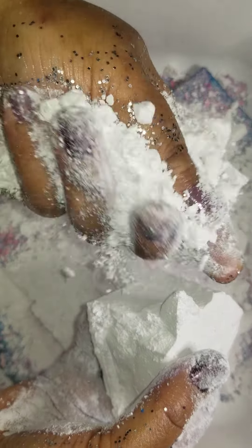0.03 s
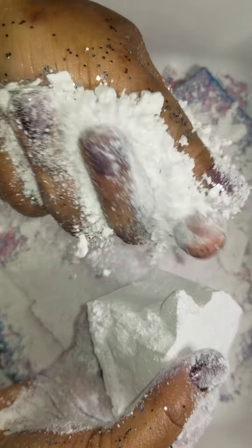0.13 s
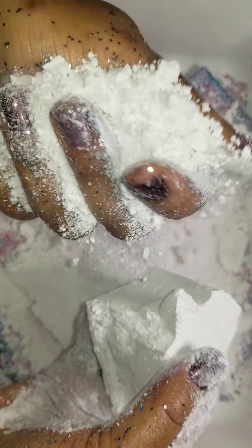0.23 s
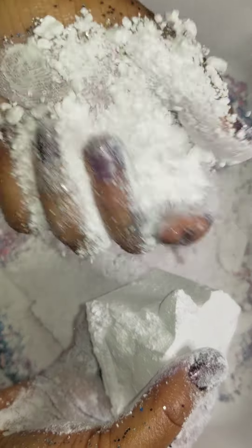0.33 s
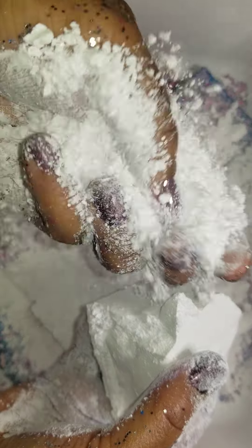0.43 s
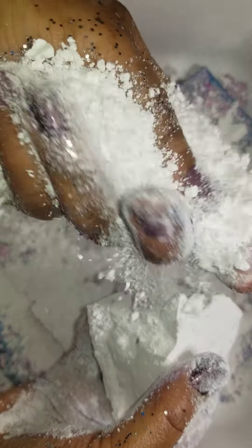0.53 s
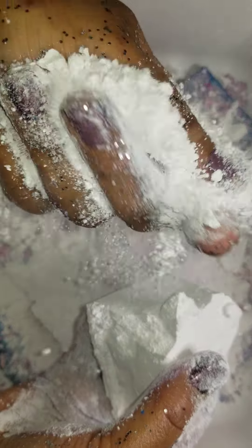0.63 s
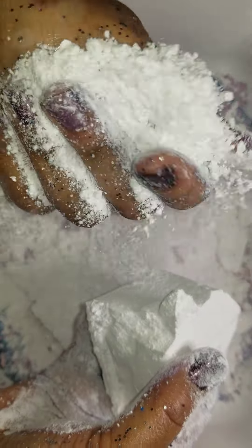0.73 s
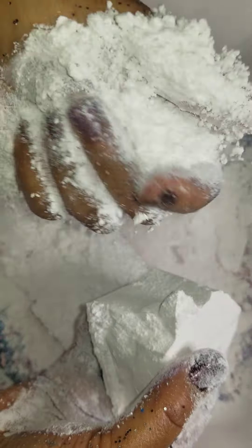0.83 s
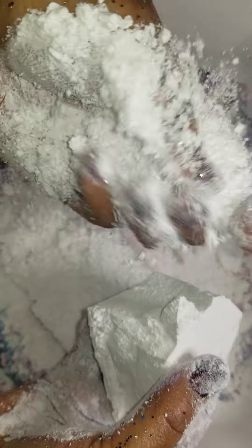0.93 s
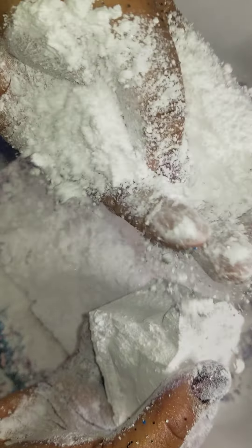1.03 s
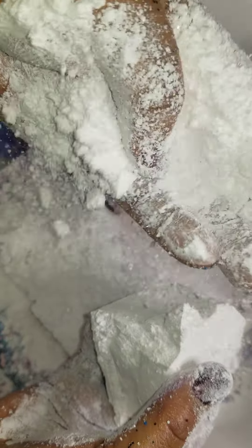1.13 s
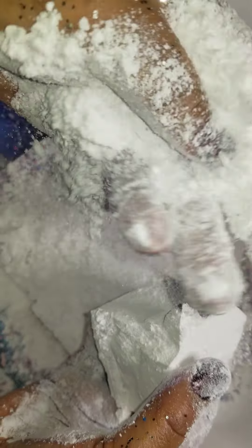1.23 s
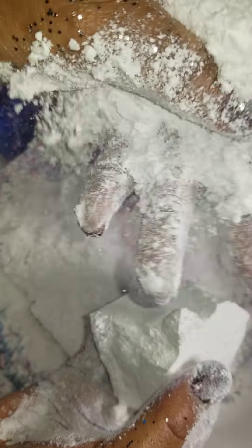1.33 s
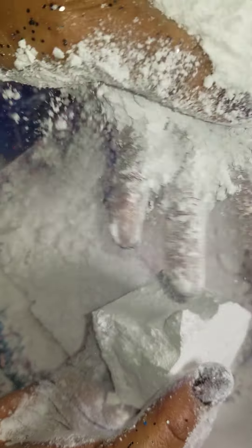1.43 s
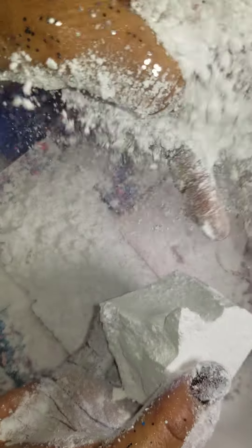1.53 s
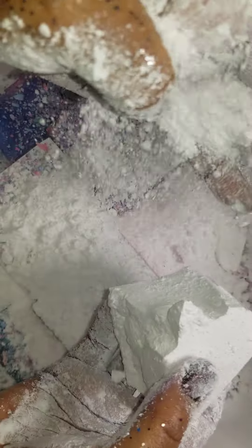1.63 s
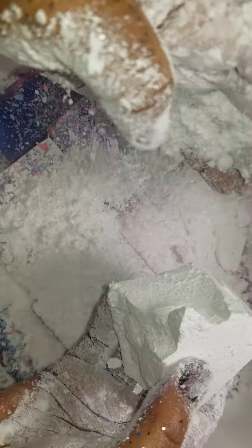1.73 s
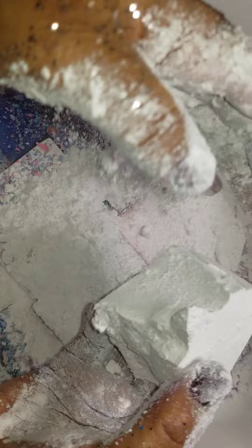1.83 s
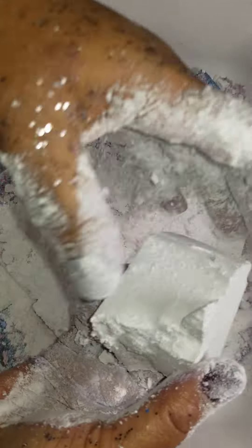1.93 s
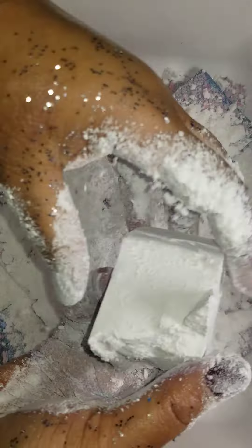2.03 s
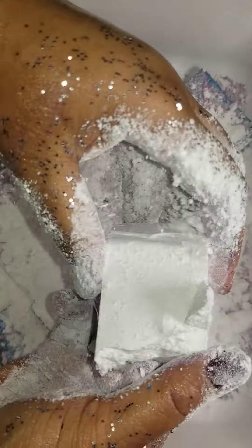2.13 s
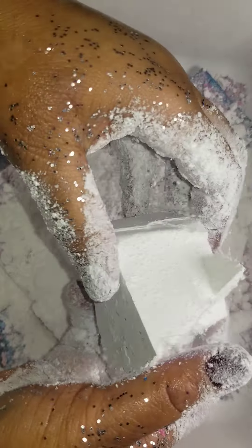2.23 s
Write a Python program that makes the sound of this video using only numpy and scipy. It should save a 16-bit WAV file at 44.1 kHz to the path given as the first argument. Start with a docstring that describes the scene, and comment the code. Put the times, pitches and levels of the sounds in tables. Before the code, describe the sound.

Hands crush soft dry chalk over a tray; sharp cracks and dull knocks come thick at first, thin out to quiet crumbs, then small snaps return and skin hisses over powder. Close, dry, faint low hum.

```python
"""A faint knock and patter on a tray come first; within a fraction of a second sharp snaps and harder knocks crowd in.
Hands crumble soft chalk close to a small microphone: each snap is a dying noise burst rung through fragment and block,
each knock a soft push on the modes of the tray. Crumbs crackle in the fist as clumped, pitched rasps, and powdery
skin slides over the block as flickering bands of noise. A wavering sine hums above a low rumble of noise."""
import sys
import numpy as np
from scipy import signal
from scipy.io import wavfile

SR = 44100
rng = np.random.default_rng(int(sys.argv[2]) if len(sys.argv) > 2 else 0)


def gain_from_decibels(decibels):
    """Convert decibel values to linear amplitude factors."""
    exponent = np.asarray(decibels, float) / 20
    return 10 ** exponent


def materialize(psi):
    """Save the field psi as 16-bit PCM at rate SR to the path in sys.argv[1].

    A 1-D psi becomes a single channel; in a 2-D psi each row is a channel.
    """
    bounded = np.clip(np.atleast_2d(psi).T, -1, 1)
    quanta = np.round(bounded * 32767).astype(np.int16)
    wavfile.write(sys.argv[1], SR, quanta)


N = 101430

# Snaps of the pieces: (time [s], peak level [dB], ring [Hz], tearing time constant [ms], broad crack share [0-1])
SNAP_EVENTS = [(0.055, -39, 4200, 3.6, 0.35), (0.0641, -39, 4280, 1.6, 0.65), (0.0908, -36.5, 6220, 1.6, 0),
               (.1366, -24, 7100, 1.8, 0.33), (0.1373, -20.5, 12200, 2.6, 0),
               (0.1719, -35.5, 1970, 4.4, 0.6), (.175, -28.5, 14300, 2, 0.1), (.197, -31, 4770, 1.6, 0.25),
               (.2162, -22, 3180, 2.5, 0.17), (0.2184, -24, 11900, 1.4, 1), (0.239, -29, 2880, 3.1, 0.38),
               (.2576, -29.5, 2200, 2.6, 0), (0.2927, -28.5, 1680, 3.4, 0.45),
               (0.3046, -41.5, 3876, 1.7, 0.4), (0.3891, -34, 7200, 1.2, 0.03), (.419, -41.5, 3900, 1.1, 1),
               (0.4541, -22, 6600, 1.9, 0), (.476, -37.5, 3150, 2.6, 0.9), (0.506, -36, 3080, 6.1, 0),
               (0.5107, -24, 3400, 3.9, 0.98), (0.51, -29.5, 8000, 1.9, 0.22), (.518, -43, 3000, 1.3, 0.3),
               (.552, -31.5, 3680, 3.4, 0.42), (0.5743, -32, 2600, 0.75, 0), (0.583, -44, 3450, 2.8, .5),
               (.5865, -48, 6960, 0.8, 0), (0.609, -19, 3700, 0.99, 0.04), (0.641, -42, 2100, 3.1, 0.57),
               (.713, -41.5, 2120, 1.7, 0.5), (0.72, -39, 4100, 2.2, 0.23), (0.754, -38.5, 6470, 0.78, 0.7),
               (0.8132, -22, 2480, 0.34, 0.36), (0.842, -39.5, 3640, 2.7, 0.33), (0.885, -38, 3540, 2.2, 0),
               (.9028, -41.5, 6300, 1.1, 0.1), (1.0163, -39.5, 4380, 1, 0.31),
               (1.04, -42, 4310, 1.93, 0.62), (1.214, -46, 5500, 1.8, 0.1),
               (1.2863, -38.5, 7000, 0.26, 0.45), (1.3037, -43, 5060, 1.37, 0),
               (1.346, -42.5, 3780, 1.8, 0.1), (1.387, -46.5, 5320, 0.88, 0), (1.554, -38.5, 2880, 2.1, 0),
               (1.583, -37.5, 3900, 0.5, 0.04), (1.598, -39, 3900, 1.6, 0.04), (1.625, -43, 3600, .8, 0.1),
               (1.638, -40, 3000, 1.6, 0.4), (1.653, -32.5, 3220, 0.84, 0.3), (1.658, -41, 3100, 1.4, 0),
               (1.681, -37.5, 3180, 1.2, 0), (1.7114, -26.5, 4000, 0.7, 0), (1.7242, -28.5, 3090, 1.4, 0.4),
               (1.7362, -42, 4400, .8, 0.1), (1.751, -45, 4020, 0.71, 0), (1.869, -42.5, 3042, 1.4, 0.5),
               (1.924, -37.5, 5010, 4, 0.95), (1.977, -44.5, 5050, 0.75, 0.37)]
FIRST_BREAK = 9  # opening impulse, in units of the tearing noise's initial rms
SNAP_CYCLES = 4.7  # ring of the fragment to -60 dB
BARE_SPAN, TOP_SPAN = 2.18, 3.0  # bare crack's band and top roll-off, as factors of the ring frequency
# Modes of the chalk block: (frequency [Hz], relative level [dB], decay to -60 dB [s])
BLOCK_MODES = [(970, -11.5, .012), (1706, -7, 0.014), (2182, 0.5, 0.0035), (3100, -1.5, 0.0074),
               (3800, -2, 0.0032), (4400, -2, 0.0068), (5500, -6, .006), (6500, -2.5, .006),
               (7870, -8, .005)]
BLOCK_DB, BLOCK_REACH_OCT, BLOCK_SCATTER_DB = 0, .8, 2

# Lumps knocking on the tray: (time [s], peak level [dB], contact cut-off [Hz])
KNOCK_EVENTS = [(.003, -40, 300), (0.052, -34.5, 428), (0.09, -39, 970), (0.1347, -27, 453),
                (.154, -50, 1487), (0.1715, -29.5, 1610), (0.174, -30, 263), (0.183, -24.5, 220),
                (0.2, -24.5, 297), (0.2163, -3.5, 3600), (0.238, -24, 580), (0.247, -41, 299.7),
                (0.261, -33, 299), (0.276, -35, 99), (0.292, -32.5, 2000), (0.297, -38.5, 520),
                (0.387, -45.5, 264), (.450, -47, 756), (0.507, -41.5, 800), (.575, -45.5, 660),
                (0.609, -46.5, 200), (.643, -48, 640), (0.767, -38, 890), (0.811, -41.5, 800),
                (1.018, -55, 304.3), (1.216, -48, 439.3), (1.305, -44, 255), (1.551, -52.5, 360),
                (1.641, -47.5, 900), (1.768, -53, 620), (1.926, -52, 417)]
# Modes of the tray: (frequency [Hz], relative level [dB], decay to -60 dB [s])
TRAY_MODES = [(91.7, -23, 0.078), (199.6, -14, 0.033), (302.4, -13, 0.028), (371.2, -13.5, .06),
              (468, -10, 0.039), (490, -12.5, 0.064), (690, -13, 0.062), (761, -10, 0.055), (937, 2, 0.02),
              (1200, -7, 0.017), (1387, -8.5, .022), (1750, -11, 0.012)]
MODE_SCATTER_DB = 2
PATTER_PER_S, PATTER_CUT_HZ, PATTER_DRIVE_DB = 140, 700, -39

# The fist working the crumbs: (time [s], crackle level [dB], patter level before its drive [dB])
FIST_WORK = [(0, -53.5, -37), (.05, -62, -45.5), (.15, -51, -43), (.25, -52, -38), (.33, -53, -51),
             (.37, -59.5, -52), (.42, -59.5, -49), (.5, -62.5, -79), (.55, -49, -51), (.67, -60.5, -66.5),
             (.77, -48.5, -46.5), (.86, -56, -57), (.97, -65.5, -55.5), (1.08, -68.5, -63),
             (1.18, -73, -64), (1.23, -61, -62), (1.38, -62.5, -66), (1.43, -85, -67), (1.49, -58, -71),
             (1.6, -58.5, -66), (1.7, -56, -66), (1.81, -60.5, -73), (1.86, -70.5, -73),
             (1.92, -64.5, -53.5), (2.02, -70.5, -66.5), (2.3, -70, -66.5)]
# Weight of the crumb pitches: (frequency [Hz], relative level [dB])
CRUMB_SPECTRUM = [(950, -4.5), (1800, -5.5), (3100, -4.5), (4400, -10.5), (6500, -8.5), (8000, -9.5)]
# Pitches of crumbs around each block mode: (frequency ratio [1])
CRUMB_RATIOS = [.97, 1, 1.04]
CRUMBS_PER_S, CRUMB_SIZE_DB, CRUMB_CLUMP_DB = 1800, 3.5, 5.5  # median rate, size spread, rate spread
CRUMB_MS, CRUMB_CYCLES = .7, 17  # time constant of the rasp; ring to -60 dB

# Skin sliding on powder: (time [s], hiss level [dB], brightness [dB per octave])
SKIN_SLIDE = [(0, -59, -10.5), (.1, -68, 0), (.2, -57, 0.5), (.33, -66, 1), (.45, -68.5, -1), (.55, -68, 6),
              (.67, -66.5, -4), (.78, -58.5, 0), (.88, -70.5, -5), (.95, -57, -2.5), (1.0, -67.5, -4),
              (1.15, -79.5, 0.5), (1.25, -68.5, -1.5), (1.38, -64.5, -5), (1.44, -79, -5.5),
              (1.49, -52.5, -0.5), (1.54, -57.5, -2.5), (1.8, -54.5, -3.5), (1.86, -71.5, 1),
              (1.92, -56.5, -3.5), (2.02, -72.5, 0), (2.06, -59.5, 2.5), (2.16, -53, -1.5), (2.2, -50, 2.5),
              (2.218, -43, 3), (2.23, -49, 1.5), (2.275, -51, -2), (2.287, -68.5, 9), (2.3, -67, 1)]
# Spectrum of the hiss: (frequency [Hz], relative density [dB per Hz])
HISS_SPECTRUM = [(1300, -21), (2500, -17), (3000, -7), (4000, -1), (5200, 0), (6800, -5), (9000, -6),
                 (12000, -8.5), (16000, -10.5)]
HISS_PATCHY_DB, TILT_PIVOT_HZ = 2.5, 7000

# Course of the hum: (time [s], frequency [Hz], level [dB]), before the waver
HUM_COURSE = [(0, 60.4, -57.5), (.3, 60.4, -49.5), (.45, 61.6, -72), (.58, 59.7, -53), (.8, 59.1, -50),
              (1.0, 61.4, -42.5), (1.2, 59, -46.5), (1.27, 60.3, -53.5), (1.35, 57.2, -58),
              (1.43, 57.57, -60.5), (1.56, 58.27, -49.5), (1.9, 58.7, -45.5), (2.23, 56.3, -44),
              (2.3, 55.8, -44.5)]
HUM_WAVER_DB, HUM_WAVER_HZ = .8, .5
# Spectrum of the rumble: (frequency [Hz], relative density [dB per Hz])
RUMBLE_SPECTRUM = [(25, -8.5), (50, 7), (85, 5), (112, -9), (145, -1.5), (200, -17.5), (400, -22),
                   (900, -38.5)]
RUMBLE_DB = -55.5

BASS_CUT_HZ, TOP_CUT_HZ = 30, 16900


def rms_one(x):
    """Normalization: scale a signal to rms 1."""
    return x / np.sqrt(np.mean(x ** 2) + 1e-20)


def in_time(rows):
    """Linear interpolation: the columns of a table become curves in time."""
    s, *columns = np.transpose(rows)
    return [np.interp(np.arange(N) / SR, s, c) for c in columns]


def at_hz(points, hz):
    """Spectral interpolation in dB along a logarithmic frequency axis."""
    table_hz, table_db = np.transpose(points)
    return np.interp(np.log(hz), np.log(table_hz), table_db)


def drift(rate):
    """Slow random fluctuation: noise through two poles at rate [Hz], with rms 1."""
    step = 40  # samples between drawn values
    r = np.exp(-2 * np.pi * rate * step / SR)
    noise = rng.standard_normal(N // step + 2002)
    slow = signal.lfilter([1], [1, -2 * r, r * r], noise)[2000:]  # the filter has settled
    return np.interp(np.arange(N) / step, np.arange(len(slow)), rms_one(slow - slow.mean()))


def ring(push, hz, t60):
    """Damped resonance: a unit impulse starts a decaying sine of nominal height 1."""
    r = gain_from_decibels(-60 / (t60 * SR))
    w = 2 * np.pi * min(hz, .45 * SR) / SR
    return signal.lfilter([0, np.sin(w)], [1, -2 * r * np.cos(w), r * r], push + 1e-18)


def soften(x, hz):
    """Contact compliance: two one-pole low-passes spread a blow in time."""
    r = np.exp(-2 * np.pi * hz / SR)
    return signal.lfilter([(1 - r) ** 2], [1, -2 * r, r * r], x)


def clicks(per_s, size_db):
    """Random impulse process: independent clicks of either sign, with exponentially spread dB sizes."""
    size = gain_from_decibels(size_db * np.minimum(rng.exponential(1, N), 4))
    sign = rng.choice([-1, 1], N)
    return size * sign * (rng.random(N) < per_s / SR)


def banded_noise(spectrum, low_hz, patchy_db, tilt_db, count):
    """Filter-bank synthesis: third-octave noise bands flicker partly together, with a tilt about the pivot."""
    edges = low_hz * 2 ** (np.arange(count + 1) / 3)
    white = rng.standard_normal((2, N))
    together = drift(60)
    out, power = 0, 0
    for k, (low, high) in enumerate(zip(edges, edges[1:])):
        hz = np.sqrt(low * high)
        bandpass = signal.butter(2, [low, min(high, .45 * SR)], "band", fs=SR, output="sos")
        band = signal.sosfilt(bandpass, white[k % 2])  # neighbours draw on separate noise
        gain = gain_from_decibels(at_hz(spectrum, hz) + tilt_db * np.log2(hz / TILT_PIVOT_HZ))
        flicker = gain_from_decibels(patchy_db * (.5 * together + drift(23)))
        out = out + gain * flicker * band
        power = power + gain ** 2 * (high - low) / (SR / 2)
    return out / np.sqrt(power)


def block_ring(burst, snap_hz):
    """Modal excitation: a snap wakes the modes of the block near its own pitch, in alternating phase."""
    scatter = rng.normal(0, BLOCK_SCATTER_DB, len(BLOCK_MODES))
    out = 0
    for k, (hz, db, t60) in enumerate(BLOCK_MODES):
        reach = np.exp(-(np.log2(hz / snap_hz) / BLOCK_REACH_OCT) ** 2)
        out = out + (-1) ** k * gain_from_decibels(db + scatter[k]) * reach * ring(burst, hz, t60)
    return gain_from_decibels(BLOCK_DB) * out


def snaps():
    """Brittle fracture: a dying noise burst, partly bare, partly rung through the fragment and the block."""
    t = np.arange(1536) / SR
    out = np.zeros(N + 2048)
    for s, db, hz, tear_ms, broad in SNAP_EVENTS:
        burst = rng.standard_normal(len(t)) * np.exp(-t * 1000 / max(tear_ms, .1))
        burst[0] += FIRST_BREAK
        rung = ring(burst, hz, SNAP_CYCLES / hz) + block_ring(burst, hz)
        rung = rung - soften(rung, hz / 3)  # takes away the lows
        bare_band = signal.butter(2, [hz / BARE_SPAN, min(hz * BARE_SPAN, .45 * SR)], "band", fs=SR)
        bare = signal.lfilter(*bare_band, burst)
        broad = np.clip(broad, 0, 1)
        one = (1 - broad) * rms_one(rung) + broad * rms_one(bare)
        one = soften(one, hz * TOP_SPAN)
        i = int(s * SR)
        out[i:i + len(t)] += gain_from_decibels(db) * one / np.abs(one).max()
    return out[:N]


def patter_push(patter_db):
    """Granular impact: many small softened clicks push the tray."""
    push = soften(clicks(PATTER_PER_S, 1.7), PATTER_CUT_HZ)
    return gain_from_decibels(patter_db + PATTER_DRIVE_DB) * rms_one(push)


def tray(patter):
    """Modal superposition: patter and knocks ring the tray; a softer knock favours the low modes."""
    hit = np.eye(1, 8000)[0]  # unit impulse
    out = sum(gain_from_decibels(db) * ring(patter, hz, t60) for hz, db, t60 in TRAY_MODES)
    out = np.append(out, np.zeros(len(hit)))
    phase = (-1) ** np.arange(1, len(TRAY_MODES) + 1)  # neighbours oppose each other in a knock
    for s, db, cut_hz in KNOCK_EVENTS:
        push = soften(soften(hit, cut_hz), cut_hz)
        strength = phase * gain_from_decibels(rng.normal(0, MODE_SCATTER_DB, len(TRAY_MODES)))
        one = sum(g * gain_from_decibels(mode_db) * ring(push, hz, t60)
                  for (hz, mode_db, t60), g in zip(TRAY_MODES, strength))
        i = int(s * SR)
        out[i:i + len(hit)] += gain_from_decibels(db) * one / np.abs(one).max()
    return out[:N]


def crumbs():
    """Clustered micro-fracture: crumbs give way in clumps, each a dying rasp ringing at its own pitch; rms 1."""
    rate = CRUMBS_PER_S * gain_from_decibels(CRUMB_CLUMP_DB * drift(60))
    grains = clicks(rate, CRUMB_SIZE_DB)
    pitches = np.outer([hz for hz, _, _ in BLOCK_MODES], CRUMB_RATIOS).ravel()
    dealt = rng.integers(0, len(pitches), N)  # which pitch a grain gets
    grit = rng.standard_normal(N)
    fade = np.exp(-1000 / (CRUMB_MS * SR))
    out = 0
    for k, hz in enumerate(pitches):
        rasp = grit * signal.lfilter([1], [1, -fade], grains * (dealt == k) + 1e-18)
        rung = ring(rasp, hz, CRUMB_CYCLES / hz)
        rung = ring(rung, hz, CRUMB_CYCLES / 2 / hz)
        out = out + gain_from_decibels(at_hz(CRUMB_SPECTRUM, hz)) * rms_one(rung)
    return rms_one(out)


def slide():
    """Sliding friction: skin on powder hisses as patchy noise of changing level and brightness."""
    hiss_db, bright_db = in_time(SKIN_SLIDE)
    return gain_from_decibels(hiss_db) * banded_noise(HISS_SPECTRUM, 1300, HISS_PATCHY_DB, bright_db, count=11)


def hum():
    """Phase integration: a low sine wanders in level and frequency."""
    hz, db = in_time(HUM_COURSE)
    level = gain_from_decibels(db + HUM_WAVER_DB * drift(11))
    phase = 2 * np.pi * np.cumsum(hz + HUM_WAVER_HZ * drift(7.1)) / SR
    return np.sqrt(2) * level * np.sin(phase)  # the level is an rms value


def rumble():
    """Stationary low-frequency noise: a fixed spectrum with slight flicker in its bands."""
    return gain_from_decibels(RUMBLE_DB) * banded_noise(RUMBLE_SPECTRUM, 25.3, 0.67, 0, count=16)


def scene():
    """Linear superposition: all sources add, close and dry."""
    crackle_db, patter_db = in_time(FIST_WORK)
    crackle = gain_from_decibels(crackle_db) * crumbs()
    mix = snaps() + tray(patter_push(patter_db)) + crackle + slide() + hum() + rumble()
    return mix[None]


def band_limit(x):
    """A steep low-pass at the top of the band."""
    return signal.sosfilt(signal.butter(12, 16520, fs=SR, output="sos"), x)


def record(dry):
    """Band limitation: a high-pass thins the bass and a steep low-pass cuts the top."""
    bass_cut = signal.butter(2, BASS_CUT_HZ, "high", fs=SR, output="sos")
    top_cut = signal.cheby2(10, 60, TOP_CUT_HZ, fs=SR, output="sos")  # 60 dB down from its edge upward
    mix = signal.sosfilt(top_cut, signal.sosfilt(bass_cut, dry))
    return band_limit(mix)


dry = scene()
out = record(dry)
materialize(out)
```